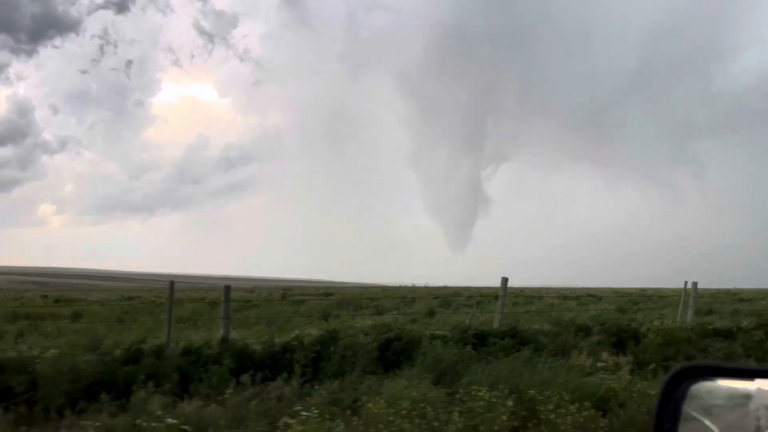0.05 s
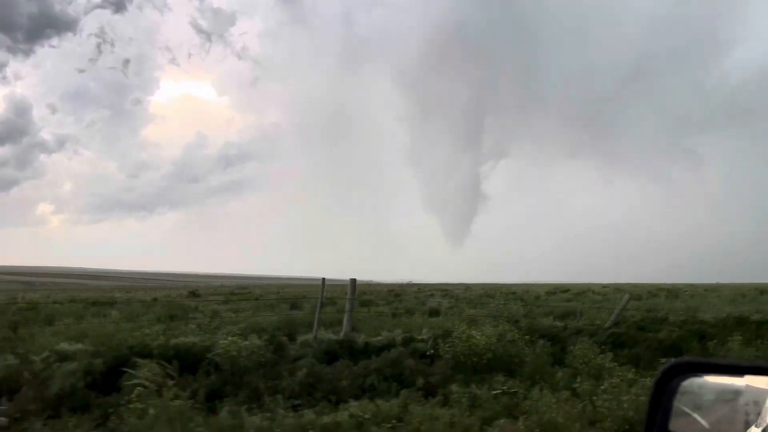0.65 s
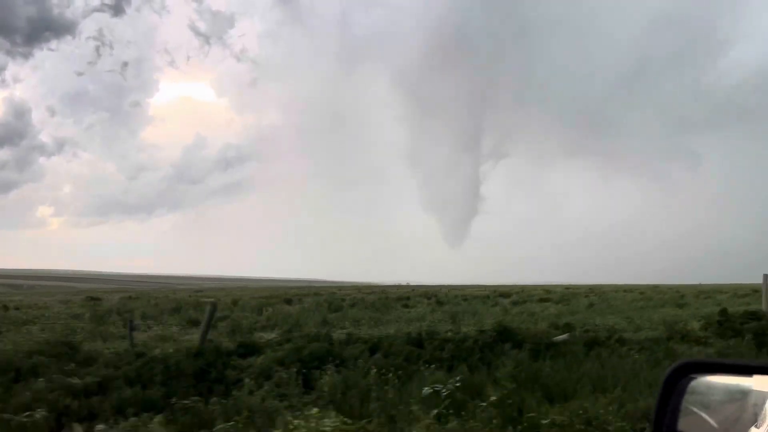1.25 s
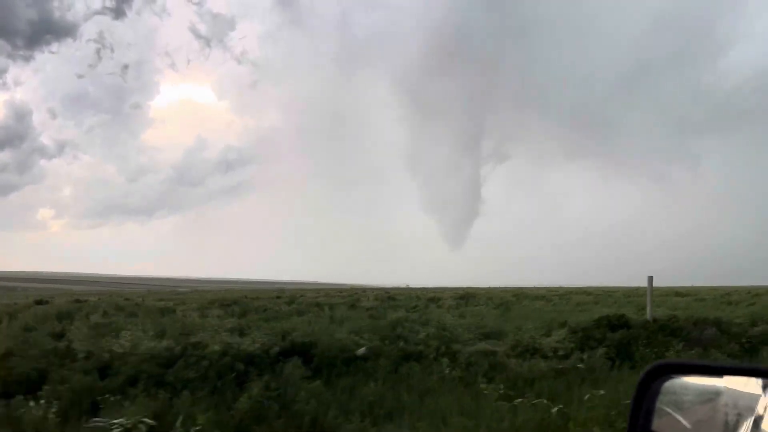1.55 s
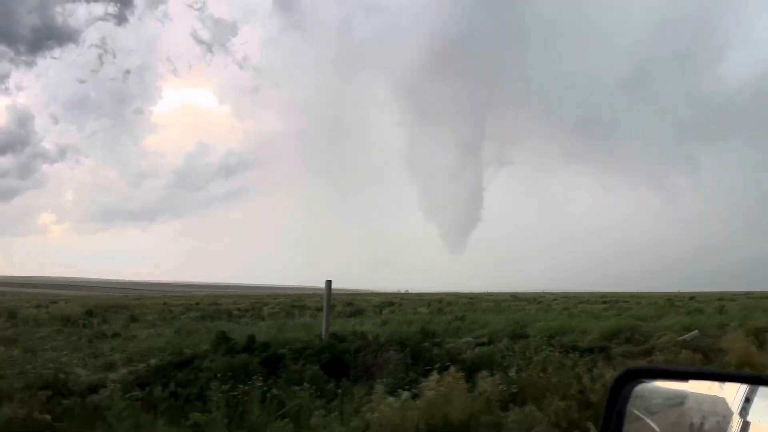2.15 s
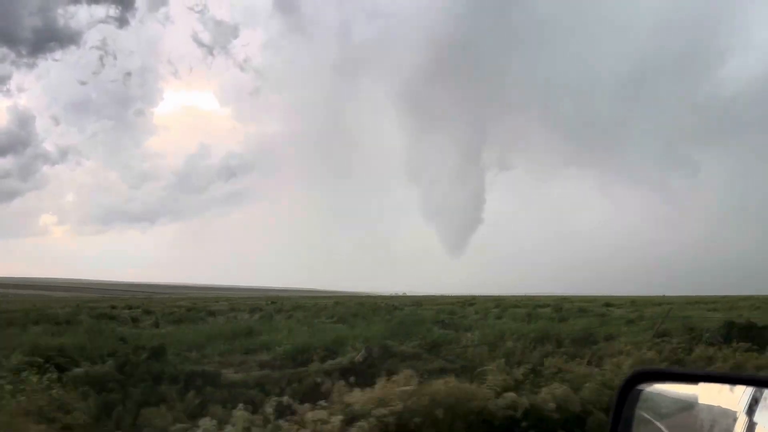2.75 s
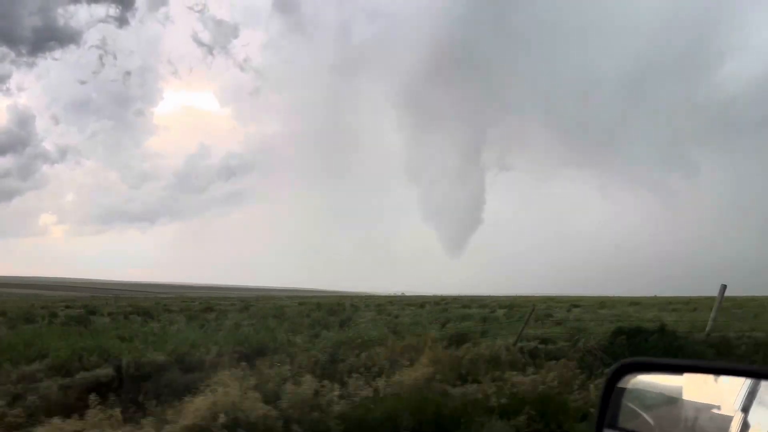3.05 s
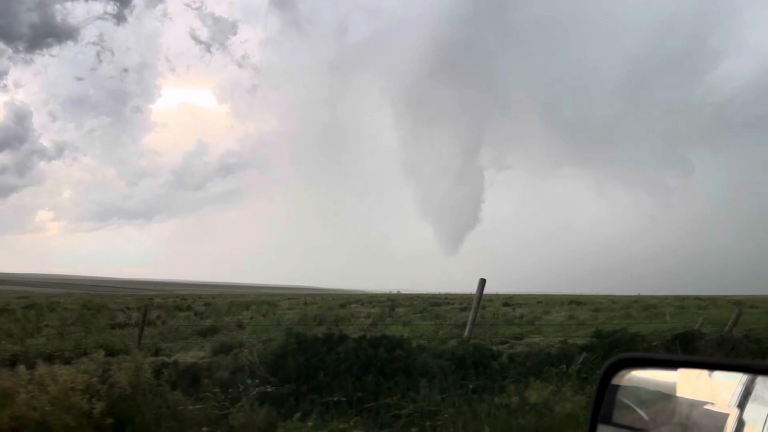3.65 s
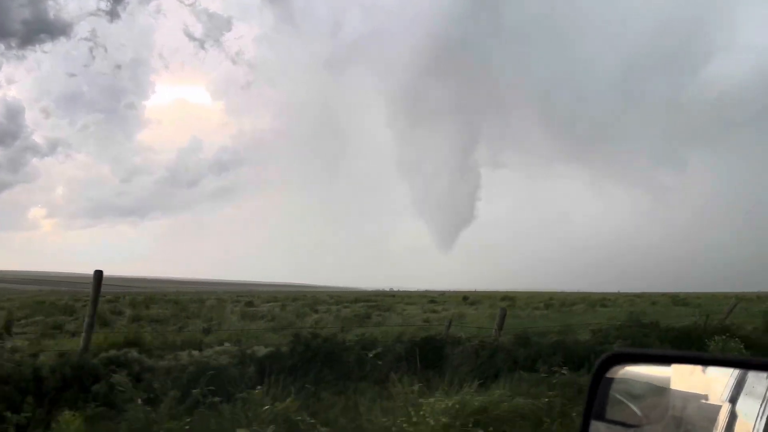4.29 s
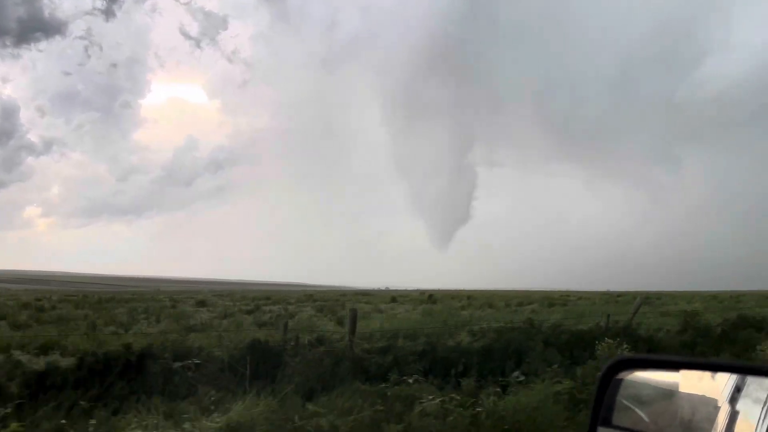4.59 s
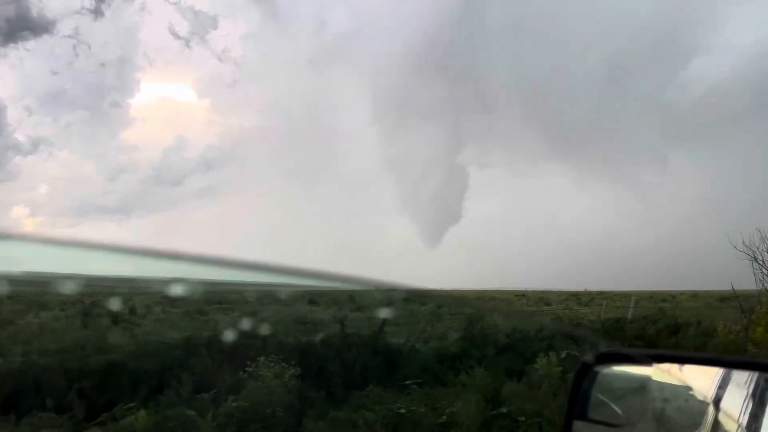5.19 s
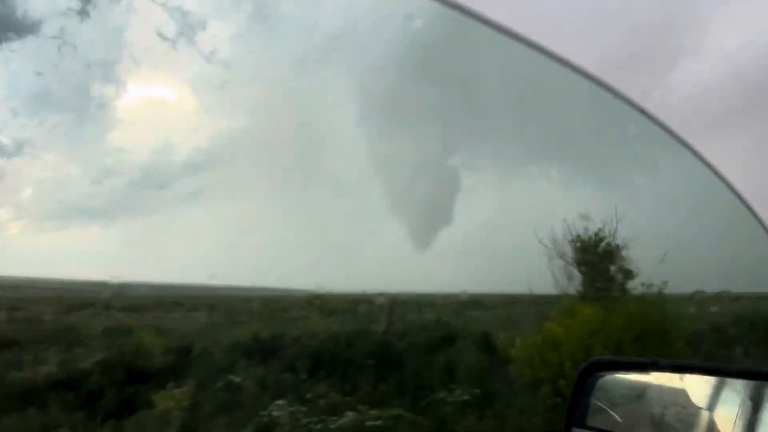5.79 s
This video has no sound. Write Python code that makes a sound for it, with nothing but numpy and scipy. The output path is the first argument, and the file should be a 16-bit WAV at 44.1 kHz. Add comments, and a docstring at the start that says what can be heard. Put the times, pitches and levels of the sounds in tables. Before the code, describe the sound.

Storm wind buffets a microphone in a moving car with slaps, pops and deep rumble, then hisses briefly as the window closes.

```python
"""Storm wind at the open side window of a moving car, beating on a hand-held stereo microphone.
From the start, air rushes past, the road roars and the cabin throbs. Almost at once eddies (whirls of
air) hit the microphone's two openings, its ports: each is a crack, a slap and a late low push.
Raindrops begin to tick on the casing, the closest eddies add dry pops, and soft surges swell the throb.
The blows are hardest at 1-2 s. Near 5.7 s the window closes and air hisses through the narrowing gap."""
import sys
import numpy as np
from scipy import signal
from scipy.fft import rfft, irfft, next_fast_len
from scipy.io import wavfile
from scipy.ndimage import uniform_filter1d, minimum_filter1d

SR = 44100
rng = np.random.default_rng(int(sys.argv[2]) if len(sys.argv) > 2 else 0)


def unload_wav(signal):
    """Save mono or channel-first audio to the path in sys.argv[1] as 16-bit WAV at rate SR, clipped to [-1, 1]."""
    wavfile.write(
        sys.argv[1],
        SR,
        np.round(np.clip(np.atleast_2d(signal).T, -1, 1) * 32767).astype(np.int16),
    )


N = 261513
TIME = np.arange(N) / SR
PADDED = next_fast_len(N + 4096)
BIN_HZ = np.arange(PADDED // 2 + 1) * SR / PADDED
LEFT_RIGHT = np.array([[.5], [-.5]])   # splits a difference between the two ports


def from_db(db):
    """Turn decibels into a gain to multiply by."""
    return 10 ** (np.asarray(db) / 20)


def unit_power(x):
    """Scale a signal to an average power of 1."""
    return x / np.sqrt(np.mean(x ** 2) + 1e-20)


def in_time(rows):
    """Join a table's rows with straight lines: one curve for each column after the time."""
    times, *columns = np.transpose(rows)
    return [np.interp(TIME, times, column) for column in columns]


def at_hz(points, hz):
    """Read a table at any frequency, with the octaves evenly spaced."""
    f, value = np.transpose(points)
    return np.interp(np.log(np.maximum(hz, 1)), np.log(f), value)


def filtered(x, gain):
    """Give each frequency its own gain."""
    return irfft(rfft(x, PADDED) * gain, PADDED)[..., :N]


def drift(rate_hz, step=40):
    """A smooth random wobble with a typical size of 1."""
    r = np.exp(-2 * np.pi * rate_hz * step / SR)
    slow = signal.lfilter([1], [1, -2 * r, r * r], rng.standard_normal(N // step + 2002))[2000:]
    return np.interp(np.arange(N) / step, np.arange(len(slow)), unit_power(slow))


def steadied(x, seconds):
    """Even out the chance swells of a noise over the given time."""
    size = max(int(seconds * SR), 2)
    power = uniform_filter1d(uniform_filter1d(np.mean(x ** 2, axis=0), size), size)
    return x / np.sqrt(np.maximum(power, 0) + 1e-9)


def port_noise(gain, likeness):
    """Filtered noise at the two ports: likeness 1 is the same in both, 0 is unrelated."""
    alike = np.clip(at_hz(likeness, BIN_HZ), 0, 1)
    mid, side = rfft(rng.standard_normal((2, PADDED)))
    pair = np.sqrt(1 + alike) * mid + np.sqrt(1 - alike) * side * [[1], [-1]]
    return unit_power(irfft(gain * pair, PADDED)[:, :N])


# how alike flowing air sounds at the two ports: f/Hz, likeness/0-1
FLOW_LIKENESS = [(40, .97), (130, .95), (290, .88), (640, .55), (1400, .15), (3000, .3), (7000, .2),
                 (10000, .85), (12500, .4)]
def flow_noise(tone, flicker_db, swirl_hz):
    """Noise that flickers as the air swirls; it dies away above the last row of its tone table."""
    gain = from_db(at_hz(tone, BIN_HZ)) / np.maximum(BIN_HZ / tone[-1][0], 1) ** 4
    return unit_power(port_noise(gain, FLOW_LIKENESS) * from_db(flicker_db * drift(swirl_hz)))


STIFF_WIND_DB = -48   # the rush level that counts as a stiff wind
# strength of the passing air: t/s, rush level/dB, hiss level/dB
AIR_LEVELS = [(0.0, -66, -75), (0.08, -65, -67.5), (0.58, -62, -63), (0.67, -54.5, -66),
              (0.83, -52.5, -62.5), (1.29, -49.5, -60.5), (1.39, -49, -62), (1.57, -55.5, -66.5),
              (1.85, -60, -59), (2.05, -59, -68), (2.2, -65, -60.5), (2.44, -66, -65), (2.55, -55.5, -63),
              (2.62, -57, -63), (2.7, -65, -65.5), (2.85, -53.5, -63), (3.02, -59, -63.5),
              (3.26, -60.5, -61), (3.35, -53.5, -60.5), (3.53, -58, -59.5), (3.63, -58.5, -60),
              (3.8, -62, -63), (4.03, -63.5, -62.5), (4.21, -54.5, -63), (4.34, -51.5, -56.5),
              (4.43, -47.5, -51), (4.54, -51, -57), (4.77, -59, -59), (5.35, -60.5, -62),
              (5.5, -61.5, -63.5), (5.7, -61, -65.5), (5.93, -62.5, -58)]
# tone of the rush: f/Hz, level/dB
RUSH_TONE = [(600, -40), (1300, -5), (1800, -0.5), (2200, 4.5), (2600, 4.5), (2950, 1.5), (3500, -7),
             (5000, -18), (9000, -33)]
# tone of the higher hiss: f/Hz, level/dB
HISS_TONE = [(1000, -34), (3000, 5), (4500, 8), (5700, 7), (6500, 5.5), (8300, 6.5), (10000, -3),
             (12000, 2), (14000, 3), (16000, -21.5)]
def passing_air(swell_db_per_s=42.5):
    """Air rushes and hisses along the car; the longer a surge, the more it swells the rush."""
    swell_db = swell_db_per_s * sum(length * bell(t, 2 * length) for t, length, _ in SOFT_SURGES)
    rush_db = STIFF_WIND_DB + 2 + 0.86 * wind_db() + swell_db
    hiss_db = in_time(AIR_LEVELS)[1] + 5
    rush = from_db(rush_db) * flow_noise(RUSH_TONE, flicker_db=1.5, swirl_hz=14)
    return rush + from_db(hiss_db) * flow_noise(HISS_TONE, flicker_db=3, swirl_hz=30)


def wind_db():
    """How far the passing air is above or below a stiff wind, moment by moment."""
    return in_time(AIR_LEVELS)[0] - STIFF_WIND_DB


# steady part of the road's roar: t/s, level/dB
ROAD_LEVEL = [(0, -47), (0.7, -43), (2.7, -47.5), (3.7, -46.5), (4.9, -47), (5.93, -48.5)]
# tone of the roar: f/Hz, level/dB
ROAD_TONE = [(100, -6.5), (250, 6.5), (450, -8.5), (820, 1.5), (1150, -6.5), (1700, -12), (2500, -26.5),
             (5000, -37)]
def road_roar(stiff_wind_adds_db=-40):
    """The road roars all the way through, louder when the wind picks up."""
    gain = np.hypot(from_db(in_time(ROAD_LEVEL)[0]), from_db(stiff_wind_adds_db + wind_db()))
    return gain * flow_noise(ROAD_TONE, flicker_db=3.5, swirl_hz=25)


# strength of the gusts: t/s, level/dB
GUST_LEVEL = [(0.0, -32.5), (0.16, -26.5), (0.78, -22), (1.34, -19), (1.55, -41), (1.95, -26.5),
              (2.18, -28.5), (2.46, -31), (2.86, -23.5), (3.01, -29), (3.35, -27.5), (3.45, -35),
              (3.73, -33.5), (4.18, -34.5), (4.33, -24.5), (4.42, -23), (4.52, -32.5), (4.91, -32),
              (5.5, -33.5), (5.93, -29.5)]
# tone of the cabin's deep throb: f/Hz, level/dB
THROB_TONE = [(15, -54), (25, -6.5), (33, -5), (43, -6.5), (56, -0.5), (75, -10.5), (100, -11), (150, -41),
              (300, -47.5)]
# tone of the flutter above it: f/Hz, level/dB
FLUTTER_TONE = [(50, -51.5), (100, -3.5), (150, 1), (250, -9), (400, -11), (700, -25), (1500, -40.5),
                (4000, -56)]
def cabin_throb():
    """Cabin air throbs at the open window with gusts, wakes and surges; small whirls flutter on top."""
    gust, wake, surge = from_db(in_time(GUST_LEVEL)[0]), wakes(), surges()
    throb_gain = np.hypot(gust, from_db(-6) * wake + surge)
    flutter_gain = np.hypot(from_db(-7) * gust, from_db(-11.5) * wake + from_db(-21.5) * surge)
    throb = steadied(flow_noise(THROB_TONE, flicker_db=2, swirl_hz=8), seconds=0.021)
    flutter = flow_noise(FLUTTER_TONE, flicker_db=4, swirl_hz=34)
    return throb_gain * throb + flutter_gain * flutter


# big eddies hitting the ports: t/s, length/s, level/dB, brightness/(dB per octave), low push/dB
BIG_EDDIES = [(0.091, 0.00044, -31, -30.5, -17.5), (0.249, 0.003, -27, -10, -14),
              (0.268, 0.0087, -21.5, -10, -18), (0.29, 0.0023, -27, -10.5, -39),
              (0.3626, 0.0066, -23.5, -31.5, -15), (0.384, 0.011, -36, -6, -21),
              (0.3982, 0.0092, -21.5, -9, -33), (0.512, 0.006, -27.5, -7, -26.5),
              (0.5256, 0.00079, -24.5, -8.0, -32.5), (0.539, 0.0046, -19, -3.5, -20.5),
              (0.547, 0.012, -26, -8.5, -13.5), (0.589, 0.0086, -27, -23, -35),
              (0.637, 0.0033, -22.5, -12, -29), (0.6595, 0.0035, -20, -7.5, -11.5),
              (0.703, 0.0016, -25, -15, -31), (0.7593, 0.002, -21, -5.5, -24),
              (0.794, 0.0015, -20.5, -7, -30), (0.8158, 0.0027, -12, -9.5, -15),
              (0.8237, 0.0049, -15.0, -5.0, -11.5), (0.844, 0.0014, -19, -3, -12.5),
              (0.85, 0.002, -13, -6.5, -28), (0.862, 0.0013, -16.5, -3.5, -34),
              (0.889, 0.0024, -21.5, -13.5, -27), (0.913, 0.0018, -21.5, -6, -10.5),
              (0.9198, 0.012, -18.5, -7.0, -18.5), (0.9346, 0.0026, -23, -8, -17),
              (0.96, 0.004, -16.0, -9.5, -36.5), (0.997, 0.0018, -22.5, 0, -28.5),
              (0.9998, 0.0036, -14, -3.5, -37), (1.0135, 0.005, -24, -5.5, -8.5),
              (1.028, 0.011, -22, -8.5, -25), (1.037, 0.0023, -25.5, -0.5, -30),
              (1.0485, 0.0021, -17.5, -5.5, -23), (1.0812, 0.0028, -15.5, -4, -24.5),
              (1.13, 0.00087, -17.5, -4, -9.5), (1.137, 0.001, -14, -6, -17),
              (1.148, 0.0037, -14, -8, -23.5), (1.16, 0.0026, -14.5, -4, -11.5),
              (1.1703, 0.0054, -19.5, -6, -8.5), (1.1886, 0.0028, -13.5, -3.5, -11.5),
              (1.253, 0.005, -10, -4, -7), (1.2962, 0.0026, -14, -5, -34), (1.3025, 0.0037, -31, 2, -36),
              (1.3214, 0.0067, -20, -2.5, -21), (1.338, 0.0056, -15, -2.5, -9),
              (1.345, 0.0015, -14, -1.5, -5.5), (1.356, 0.0057, -17, -8, -12),
              (1.367, 0.0035, -22, -1, -31), (1.395, 0.00074, -17, -4.5, -24.5),
              (1.414, 0.0014, -15, -4.5, -15), (1.425, 0.0016, -14.5, 0.5, -14),
              (1.441, 0.008, -20.5, -4.5, -17), (1.485, 0.0017, -18.5, -1.5, -26.5),
              (1.498, 0.009, -23.5, -19, -33), (1.5051, 0.0036, -11, -2.5, -13),
              (1.6037, 0.0051, -18, 1.5, -18), (1.6163, 0.0027, -22, -1, -16),
              (1.682, 0.012, -29.5, -7.5, -38), (1.6938, 0.0014, -21.5, -7, -19),
              (1.7498, 0.00085, -18.5, -2.5, -16), (1.786, 0.0045, -20, -0.5, -9.5),
              (1.805, 0.003, -24.5, -8, -31), (1.8335, 0.0044, -23, -9, -33.5),
              (1.873, 0.005, -15, -2.5, -16), (1.887, 0.003, -16.5, 2, -10.5),
              (1.893, 0.002, -25.5, 3.5, -30), (1.9467, 0.0023, -24.5, -9, -36.5),
              (1.9675, 0.0013, -20.5, 2, -24), (1.977, 0.0044, -24.5, -0.5, -13),
              (2.019, 0.0027, -16.5, -4, -21.5), (2.03, 0.002, -18, -1, -19.5),
              (2.124, 0.0022, -20.5, -0.5, -50), (2.1286, 0.0047, -28, -3, -31),
              (2.3126, 0.0042, -27, -6.0, -19), (2.5357, 0.0015, -26.5, -9, -15.5),
              (3.0659, 0.002, -13, -5, -32), (3.0697, 0.00082, -12, -1, -23),
              (3.0726, 0.0045, -31, -3.5, -11), (3.173, 0.017, -29.5, -7.5, -13.5),
              (3.2074, 0.00054, -36.5, 7.5, -23), (3.2157, 0.0054, -22, -5, -12),
              (3.338, 0.00038, -33.5, 2, -11), (3.373, 0.0021, -40, -28, -11.5),
              (3.444, 0.006, -19, -12, -16.5), (3.453, 0.0025, -19.5, -3.5, -19),
              (3.462, 0.004, -21.5, -19, -16), (3.4766, 0.0057, -21.5, -2, -19.5),
              (3.4818, 0.0013, -9, -25, -11), (3.5098, 0.0016, -22, -3, -26.5),
              (3.525, 0.0013, -28, -11.5, -30), (3.603, 0.0023, -22.5, -4.5, -37),
              (3.6124, 0.0057, -26.5, -2.5, -37), (3.67, 0.0019, -20.5, -4.5, -40),
              (3.6797, 0.0036, -20, -0.5, -21), (3.928, 0.0017, -23.5, -2.0, -17),
              (3.9364, 0.0087, -26, -3, -22.5), (3.967, 0.0056, -26.5, -2.5, -23),
              (3.9838, 0.0026, -22.5, -3, -25), (4.151, 0.0097, -33, -3, -24),
              (4.1797, 0.0047, -27, -3, -30.5), (4.2767, 0.0052, -23, -5, -21.5),
              (4.293, 0.0029, -23, -3, -17), (4.303, 0.0041, -28, -6, -33),
              (4.372, 0.005, -24.5, -2.5, -21.5), (4.391, 0.0016, -25.5, 2, -17.5),
              (4.405, 0.0034, -19, -2.5, -14), (4.411, 0.0028, -16.5, -16, -15),
              (4.4197, 0.012, -28.5, 1.5, -19.5), (4.4795, 0.0034, -14.5, -3, -15),
              (4.502, 0.0056, -33, -2, -48), (4.5516, 0.0011, -20, -0.5, -31),
              (4.568, 0.0065, -24, -1, -27.5), (4.7106, 0.002, -22, 1, -22.5),
              (4.722, 0.0089, -28, -0.5, -20), (4.833, 0.0019, -31, -8, -35),
              (5.0885, 0.0058, -24.5, -5, -28.5), (5.1086, 0.0037, -33.5, -0.5, -19.5),
              (5.2797, 0.006, -30.5, -5, -17.5), (5.29, 0.0053, -34, -3, -42),
              (5.3423, 0.011, -29.5, -4, -29.5), (5.354, 0.00087, -30.5, -5.5, -17.5),
              (5.5243, 0.0077, -29, -5.5, -36.5)]
# how the ports shape the eddies' tone: f/Hz, level/dB
EDDY_TONE = [(20, -7), (35, 3.5), (60, 2.5), (120, -0.5), (250, 1.5), (500, 2), (750, 2), (1050, -7),
             (1350, -3), (1750, -4), (2500, -7), (4000, -11.5), (5800, -22), (8500, -21), (13000, -37.5)]
# how much louder the left port is, as it faces the wind: f/Hz, left minus right/dB
LEFT_BOOST = [(60, 0), (260, 0), (400, 1), (550, 3.58), (900, 7), (1300, 4.46), (2000, 6.56), (4500, 5),
              (8000, 0.94)]
# how alike the eddies sound at the two ports: f/Hz, likeness/0-1
WHIRL_LIKENESS = [(40, 0.99), (500, 1), (1000, 0.76), (4000, 0.51), (10000, 0.84)]
def eddies(lag_cycles=0.64, spread_cycles=0.13, crack_shortening=0.66, rise_share=0.79, tear_db=12.5):
    """In each blow, small high whirls arrive first and die fast; large low ones come late and linger."""
    tear = from_db(tear_db * drift(680))   # tears a hit into a few sharp snaps
    out, hits = np.zeros((2, N)), list(BIG_EDDIES) + small_eddies()
    octaves_hz = 55 * 2 ** np.arange(9)
    bands = [1 / (1 + np.abs(2 * np.log2((BIN_HZ + 1) / hz)) ** 6) for hz in octaves_hz]
    whirls = [port_noise(band, WHIRL_LIKENESS) for band in bands]
    starts = rng.integers(0, N - SR, len(hits))   # each hit gets its own stretch of noise
    for hz, whirl in zip(octaves_hz, whirls):
        whirl = steadied(whirl * (tear if hz > 600 else 1), seconds=max(1.2 / hz, .003))
        for (t, length, *blow), start in zip(hits, starts):
            centre = t + lag_cycles / (hz + 15) - .0004
            width = length * (1 - crack_shortening * hz / (hz + 1000)) + spread_cycles / (hz + 15)
            near = slice(max(int((t - .04) * SR), 0), int((t + .08) * SR))
            offset = (TIME[near] - centre) / width
            shape = 1 / np.cosh(np.clip(np.where(offset < 0, offset / rise_share, offset), -20, 20))
            burst = unit_power(shape * whirl[:, start:start + len(shape)]) * np.sqrt(np.mean(shape ** 2))
            out[:, near] += from_db(whirl_level(hz, *blow)) * burst
    facing_db = at_hz(LEFT_BOOST, BIN_HZ) * LEFT_RIGHT
    return filtered(out + pops(), from_db(at_hz(EDDY_TONE, BIN_HZ) + facing_db))


def whirl_level(hz, level_db, brightness_db, push_db, slap_hz=380, crack_hz=1700, hard_crack_db=-18.5):
    """The lowest whirl is the push; brightness tilts the rest, more steeply from slap to crack."""
    octaves, span = np.log2(min(hz, crack_hz) / slap_hz), np.log2(crack_hz / slap_hz)
    tilted_db = level_db + brightness_db * octaves * np.interp(octaves, [0, span], [0.3, 1])
    whirl_db = np.interp(np.log(hz), np.log([70, 180]), [push_db, tilted_db])
    treble_db_per_octave = 1 + min(whirl_db - hard_crack_db, 0)   # weaker cracks lose their treble
    return whirl_db + treble_db_per_octave * max(np.log2(hz / 2000), 0)


def small_eddies(stiff_wind_per_s=22, level_db=-30, spread_db=8.5, length_s=0.0019, brightness_db=-9):
    """Lesser eddies come at random, more often and harder in faster air; rows as in BIG_EDDIES."""
    speed_db, most = wind_db(), 500
    due_so_far = np.cumsum(stiff_wind_per_s * from_db(1.3 * speed_db)) / SR
    jitter, force = rng.random((most, 2)).T
    arrivals = np.searchsorted(due_so_far, np.arange(most) + jitter)
    levels_db = level_db + speed_db[np.minimum(arrivals, N - 1)] + spread_db * (2 * force - 1)
    return [(at / SR, length_s, db, brightness_db, db) for at, db in zip(arrivals, levels_db) if at < N]


def wakes(delay_s=0.017, rise_s=0.034, decay_s=0.024):
    """Each big eddy's push swells the cabin air, which then settles; gives a gain curve."""
    power = np.zeros(N)
    for t, *_, push_db in BIG_EDDIES:
        near = slice(max(int((t - .1) * SR), 0), int((t + .3) * SR))
        age = TIME[near] - t - delay_s
        power[near] += (from_db(push_db) * np.exp(np.minimum(age / rise_s, -age / decay_s))) ** 2
    return np.sqrt(power)


# larger raindrops on the casing: t/s, level/dB
BIG_DROPS = [(0.3936, -23.5), (0.8155, -28.5), (1.0535, -38), (1.2065, -35), (1.2485, -29), (1.3284, -30.5),
             (1.343, -33), (1.4588, -32), (1.6456, -30), (1.7828, -16.5), (2.272, -32), (2.843, -32),
             (3.150, -30.5), (3.191, -27.5), (3.4852, -22), (4.142, -19), (4.321, -16), (4.349, -25),
             (4.3835, -29), (4.389, -27), (4.512, -27.5), (5.0195, -22), (5.129, -39), (5.194, -31.5),
             (5.2588, -31.5)]
# notes the casing rings at: f/Hz, level/dB, time to fade by 60 dB/s
CASING_NOTES = [(1730, 1.5, 0.0014), (4800, -10, 0.0008), (6530, -16.5, 0.0052), (8610, -0.5, 0.0012),
                (11000, -14.5, 0.0024), (13700, -15.5, .002)]
def raindrops(boost_db=5, splash_s=.0007, spray_count=30, usual_drop_db=-27.5):
    """Each drop is a tiny splash that briefly rings the casing; fine spray ticks in between."""
    splashes, out, size = np.zeros((2, N)), np.zeros((2, N)), 400
    spray = [(when * (N - 2 * size) / SR, -50 + 9 * weight ** 2)
             for when, weight in rng.random((spray_count, 2))]
    for t, level_db in list(BIG_DROPS) + spray:
        noise = rng.standard_normal(size) + .3 * rng.standard_normal((2, size))
        burst = noise * np.exp(-TIME[:size] / splash_s)
        burst /= np.sqrt(np.sum(burst ** 2) / 2)
        # heavier drops reach lower in pitch
        low_hz = np.clip(3000 * 2 ** ((usual_drop_db - level_db) / 13.5), 1200, 4500)
        splash = signal.lfilter(*signal.butter(2, low_hz, "high", fs=SR), burst)
        at = int((t + .0012) * SR)
        splashes[:, at:at + size] += from_db(level_db + boost_db) * splash
    for hz, note_db, fade_s in CASING_NOTES:
        decay, turn = from_db(-60 / (fade_s * SR)), 2 * np.pi * hz / SR   # both per sample
        ring = signal.lfilter([0, np.sin(turn)], [1, -2 * decay * np.cos(turn), decay ** 2], splashes + 1e-18)
        out += from_db(note_db) * ring
    return out


# dry pops of the closest eddies: t/s, level/dB, f/Hz
DRY_POPS = [(0.5374, -17.5, 1410), (0.8428, -9, 1660), (0.862, -15.5, 1500), (0.9978, -9, 1700),
            (1.002, -12, 2210), (1.0411, -14, 1900), (1.1603, -3.5, 1690), (1.1864, -8, 1610),
            (1.2552, -2, 2700), (1.294, -10, 2700), (1.4241, -5.5, 3500), (1.485, -2.5, 3800),
            (1.5063, 2, 4700), (1.6024, -2.5, 2020), (1.6176, -14, 1310), (1.787, -1, 3220),
            (1.8872, 3.5, 3060), (1.892, -3, 3800), (1.9678, -11.5, 1640), (2.0168, -10, 2520),
            (2.031, -18, 1500), (3.0702, 1, 2090), (3.4805, -9.5, 1940), (3.672, -7, 1400),
            (3.679, -5.5, 1930), (4.278, -8.5, 1860), (4.407, -31, 1800), (4.5512, -4, 1720),
            (4.71, -0.5, 2030)]
def pops(half_length_cycles=0.53):
    """An eddy breaking right on a port makes one swing of pressure; a quicker swing sounds higher."""
    out = np.zeros(N)
    for t, level_db, hz in DRY_POPS:
        near = slice(int((t - .005) * SR), int((t + .005) * SR))
        cycles = (TIME[near] - t) * hz
        shape = np.exp(-(cycles / half_length_cycles) ** 2)
        out[near] += from_db(level_db) * shape * np.sin(2 * np.pi * cycles)
    return out


# soft surges of air: t/s, length/s, level/dB
SOFT_SURGES = [(0.742, 0.014, -10), (1.038, 0.0086, -13), (1.733, 0.017, -19.5), (2.158, 0.014, -19),
               (2.537, 0.037, -35), (2.622, 0.0096, -21), (2.846, 0.04, -11), (2.933, 0.02, -12),
               (3.003, 0.026, -11), (3.137, 0.035, -17), (3.396, 0.024, -39), (4.265, 0.013, -19.5),
               (4.444, 0.011, -16), (4.589, 0.041, -18), (4.869, 0.011, -22)]
def surges():
    """Air swells into the cabin without a slap; gives a gain curve."""
    return sum(from_db(db) * bell(t, length) for t, length, db in SOFT_SURGES)


def bell(t, length):
    """A smooth swell that reaches 1 at time t."""
    return 1 / np.cosh(np.clip((TIME - t) / length, -20, 20)) ** 2


# air through the closing window: t/s, level/dB
GAP_LEVEL = [(0, -90), (5.6, -86.5), (5.72, -66), (5.76, -44.5), (5.80, -51), (5.84, -62), (5.89, -44.5),
             (5.93, -81)]
# tone of its hiss: f/Hz, level/dB
GAP_TONE = [(2000, -33), (3900, -7), (4270, 4), (4560, 3), (5200, -4.5), (5700, -1), (5950, 8.5),
            (6300, -9.5), (10000, -14), (13500, 0.5), (16000, -11)]
def window_gap():
    """Air squeezes through the narrowing gap with a thin hiss."""
    return from_db(in_time(GAP_LEVEL)[0]) * flow_noise(GAP_TONE, flicker_db=2.2, swirl_hz=18)


# how far the left port is ahead of the right: f/Hz, phase/radians
LEFT_LEAD = [(30, 0), (70, .15), (150, .33), (400, .62), (780, .85), (1210, -.9), (2000, .4), (3100, 1.1),
             (5000, .7), (7500, 1.0), (9500, 3.0), (10800, 3.0), (12200, .3)]
def ports(x):
    """Pressure reaches the two ports a little out of step."""
    return filtered(x, np.exp(1j * at_hz(LEFT_LEAD, BIN_HZ) * LEFT_RIGHT))


def scene():
    """All the air, road and rain at the microphone."""
    return ports(eddies() + cabin_throb() + road_roar() + passing_air() + window_gap() + raindrops())


def record(dry, low_cut_hz=36, high_cut_hz=17300, ceiling=.96):
    """The deepest bass is cut, a fast limiter turns down the highest peaks, then the top treble is cut."""
    dry = signal.sosfilt(signal.butter(2, low_cut_hz, "high", fs=SR, output="sos"), dry)
    size = 221   # samples, about 5 ms
    gain = np.minimum(1, ceiling / (np.abs(dry).max(axis=0) + 1e-9))
    held = minimum_filter1d(gain, 2 * size)
    smooth = uniform_filter1d(uniform_filter1d(held, size), size)
    return signal.sosfilt(signal.cheby2(14, 70, high_cut_hz, fs=SR, output="sos"), dry * smooth)


dry = scene()
out = record(dry)
unload_wav(out)
```